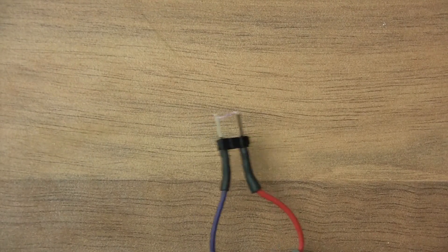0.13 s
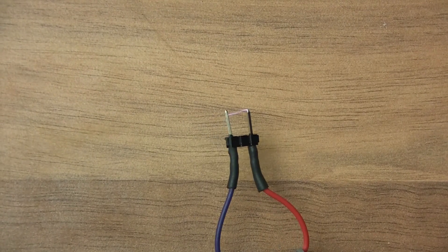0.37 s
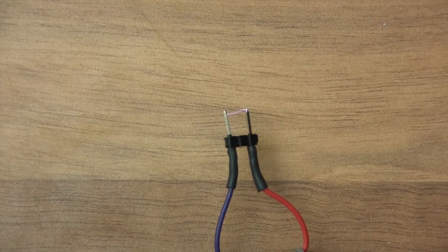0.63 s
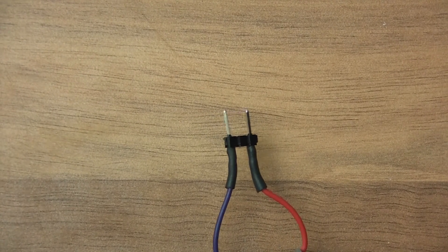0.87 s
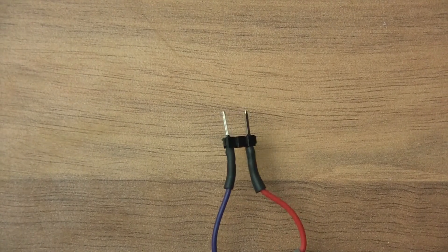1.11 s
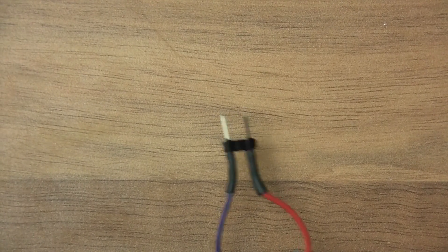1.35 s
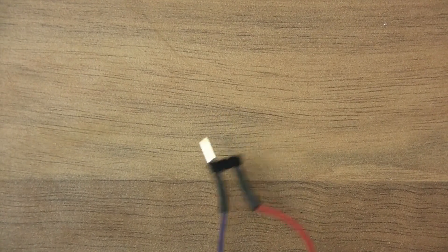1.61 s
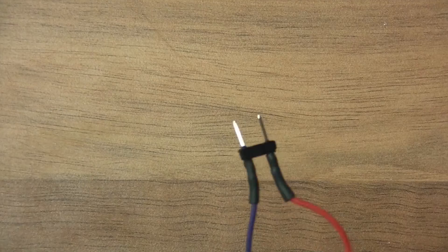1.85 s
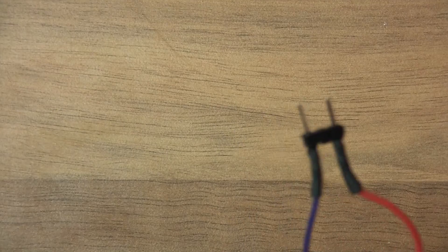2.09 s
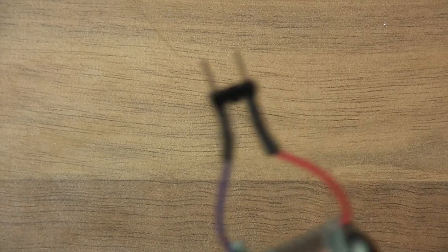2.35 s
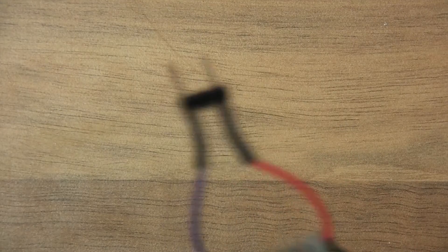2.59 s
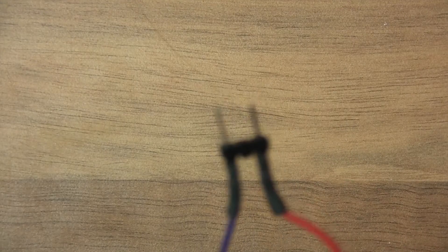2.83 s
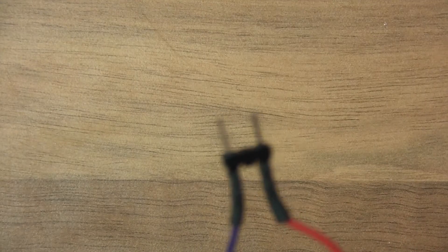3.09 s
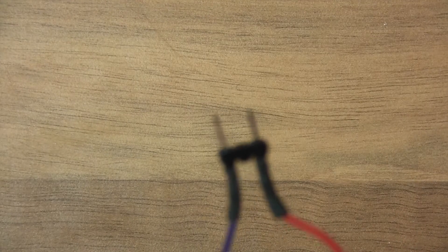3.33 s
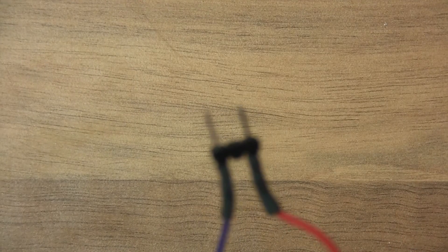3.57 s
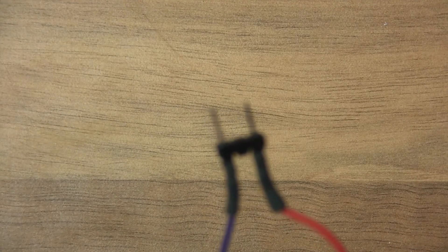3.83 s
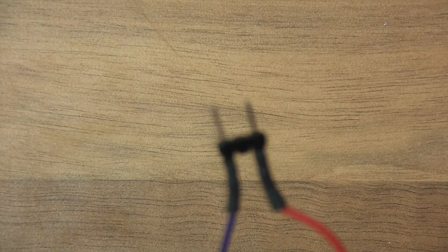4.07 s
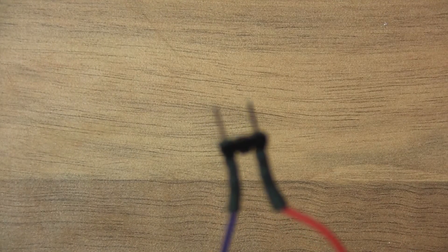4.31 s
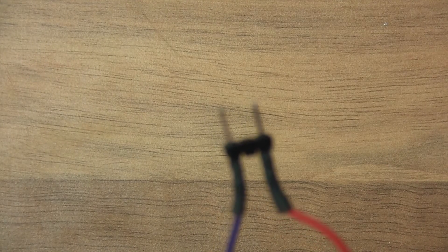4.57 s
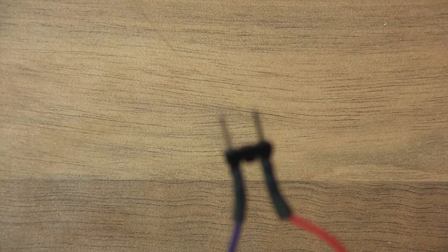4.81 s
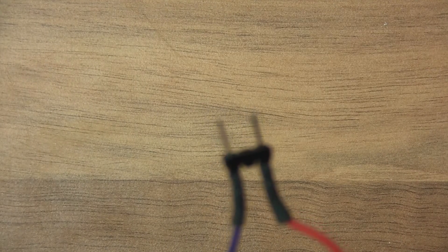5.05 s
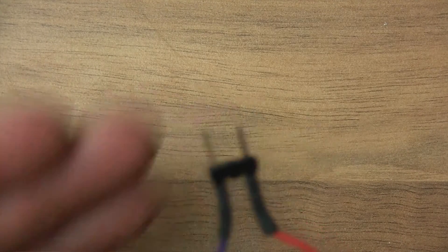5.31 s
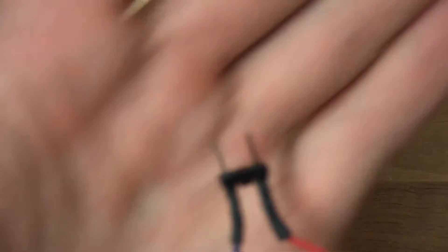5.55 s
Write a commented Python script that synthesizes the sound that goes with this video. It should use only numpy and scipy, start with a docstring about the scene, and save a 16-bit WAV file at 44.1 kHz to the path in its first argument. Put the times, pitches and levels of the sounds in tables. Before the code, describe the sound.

Steady mains hum with soft hiss and a thin, buzzing electronic whine lies under everything. Sharp sparks crack almost immediately, a faint sizzle flares unevenly, then the arc breaks with a smaller crackle. Light scrapes, tiny squeaks and scattered taps of wires on the desk follow, growing sparse. Late on, two hard clacks ring briefly on the wood. Close stereo camera microphone, small quiet room.

```python
"""A small high-voltage arc device on a wooden desk: noise-burst sparks snap, treble noise fizzes between them.
Under it lie mains hum and a spinning motor (harmonic sines), thin high whines (gated and swelling sines) and
hiss (shaped noise). Wires tick (struck modes) and rub (friction noise) on the desk; a hard object lands in two
knocks (clicks and ringing modes). A quiet room answers; the stereo camera microphone is close."""
import sys
import numpy as np
from scipy import signal
from scipy.fft import rfft, irfft
from scipy.io import wavfile
from scipy.ndimage import uniform_filter1d

SR = 44100
rng = np.random.default_rng(int(sys.argv[2]) if len(sys.argv) > 2 else 0)


def voltage_ratio(level):
    """Linear amplitude factor for a level in decibels (scalar or array-like)."""
    return 10 ** (np.asarray(level, float) / 20)


def wav_out(sig):
    """Save sig, one row per channel (or a flat mono array), as 16-bit PCM at SR to the path in sys.argv[1]."""
    wavfile.write(sys.argv[1], SR, np.round(np.clip(np.atleast_2d(sig).T, -1, 1) * 32767).astype(np.int16))


N = 249944
T = np.arange(N) / SR
RIGHTWARD = np.array([[-1], [1]])  # left, right


def along_hz(rows, hz):
    """Read a table on a log-frequency axis."""
    table_hz, values = np.array(rows).T
    return np.interp(np.log(hz + 1), np.log(table_hz), values)


def band(x, centre_hz, width_hz):
    """Butterworth band-pass."""
    edges_hz = np.clip([centre_hz - width_hz / 2, centre_hz + width_hz / 2], 20, SR / 2.1)
    return signal.sosfilt(signal.butter(2, edges_hz, "band", fs=SR, output="sos"), x)


def unit(x):
    """Scale to rms 1."""
    return x / np.sqrt(np.mean(x ** 2))


def walk(rate_hz):
    """Smooth random wander, rms 1: white noise averaged twice."""
    size = int(SR / rate_hz)
    return unit(uniform_filter1d(uniform_filter1d(rng.standard_normal(N), size), size))


def tone(hz, rms_db, lag_rad=0, start_s=0):
    """A steady sine."""
    return np.sqrt(2) * voltage_ratio(rms_db) * np.cos(2 * np.pi * hz * (T - start_s) - lag_rad)


def decay(t60_s, size):
    """Exponential fall by 60 dB in t60_s."""
    return 1000. ** (-T[:size] / t60_s)


def ring(hz, t60_s, size=12000):
    """One struck mode: a sine that decays exponentially."""
    return np.sin(2 * np.pi * hz * T[:size]) * decay(t60_s, size)


def snap(t60_ms, share, size=600):
    """An impulse followed by a short dying rattle; energy 1."""
    rattle = rng.standard_normal(size) * decay(t60_ms / 1000, size)
    rattle = share * rattle / np.linalg.norm(rattle)
    rattle[0] = 1
    return rattle / np.linalg.norm(rattle)


def swells(span_s, held_db, rows, fall_s):
    """Gain that holds a level over a span and rises above it in short swells."""
    start_s, end_s = span_s
    gain = voltage_ratio(held_db) * np.clip(np.minimum(T - start_s, end_s - T) / .03, 0, 1)
    for peak_s, peak_db, rise_s in rows:
        shape = np.interp(T, [peak_s - rise_s, peak_s, peak_s + fall_s], [0, 1, 0])
        gain = gain + voltage_ratio(peak_db) * shape ** 2
    return gain


def stroke(length_s, rise, level_db, noise):
    """One stroke of friction noise: it swells, then fades."""
    t = T[:int(length_s * SR)] / length_s
    envelope = np.interp(t, [0, np.clip(rise, .02, .98), 1], [0, 1, 0])
    return voltage_ratio(level_db) * envelope * unit(noise)[-len(t):]


def add(track, start_s, sound):
    """Mix a sound into a track."""
    i = int(start_s * SR)
    track[i:i + len(sound)] += sound[:N - i]


MAINS_HZ, MAINS_START_S, OVERTONE_LAG_RAD = 49.96, .0016, 1.4
# mains harmonics, before panning: multiple, level_db (rms)
MAINS = [(1, -43.5), (2, -90), (3, -52.5), (4, -69), (5, -61.5), (6, -74), (7, -69), (8, -83), (9, -71),
         (11, -78)]
MOTOR_HZ = 120.03
# spinning motor harmonics: multiple, level_db (rms)
MOTOR = [(1, -55.5), (10, -68.5), (12, -71.5)]


def hum():
    """Mains with locked overtones, a little stronger on the right; the motor's harmonics in the middle."""
    mains = sum(tone(k * MAINS_HZ, level_db, OVERTONE_LAG_RAD * (k > 1), MAINS_START_S)
                for k, level_db in MAINS)
    motor = sum(tone(k * MOTOR_HZ, level_db, np.pi / 2) for k, level_db in MOTOR)
    return mains * voltage_ratio(1.0 * RIGHTWARD) + motor


WHINE_HZ, BURSTS_PER_S, BURST_START_S = 9000, 50, .0052
# repeating pattern of six bursts: gain_db
BURST_GAINS_DB = [1, 4, 4.5, 0, 1.5, 1]
STEADY_HZ, PASSING_HZ = 12207, 13405
PASSING_SPAN_S, PASSING_HELD_DB, PASSING_FALL_S = (2.3, 4.03), -71, .12
# swells of the passing tone, before its wander: peak_s, peak_db (rms), rise_s
PASSING_SWELLS = [(3.55, -65, .1), (3.95, -63, .15)]


def whines():
    """Three sines: one in quick bursts with short gaps, one steady, one that comes and goes."""
    cycles = (T - BURST_START_S) * BURSTS_PER_S
    gate = np.clip((.5 - np.abs(cycles % 1 - .5)) / .17, 0, 1)
    steps = voltage_ratio(BURST_GAINS_DB)[np.floor(cycles).astype(int) % len(BURST_GAINS_DB)]
    bursts = gate * steps * tone(WHINE_HZ, -66.0) * voltage_ratio(-1.4 * RIGHTWARD)
    passing_gain = swells(PASSING_SPAN_S, PASSING_HELD_DB, PASSING_SWELLS, PASSING_FALL_S)
    passing = passing_gain * voltage_ratio(2.5 * walk(12)) * tone(PASSING_HZ, 0)
    return bursts + tone(STEADY_HZ, -70) + passing


# room and microphone hiss, density before humps and scaling: pitch_hz, level_db (per Hz)
HISS = [(25, -81), (65, -86), (82, -79.5), (105, -83.5), (190, -85.5), (320, -89), (900, -92.5),
        (1500, -90.5), (2100, -94), (4000, -96), (8000, -97), (13000, -98.5), (14900, -97), (15400, -112),
        (16000, -130)]
# broad humps on it: centre_hz, width_hz, gain_db
HUMPS = [(262.8, 15, 10), (401, 6, 10), (530, 83, 4), (658, 42, 3.5), (798, 27, 7), (1030, 400, 5.5),
         (1300, 73, -0.5)]
# left-right correlation: pitch_hz, likeness (0-1)
LIKENESS = [(100, 0.54), (300, 0.63), (640, 0.74), (1400, 0.26), (3000, 0.35), (15000, 0.13)]


def hiss():
    """Coloured noise, more alike on both sides in the bass than in the treble."""
    hz = np.fft.rfftfreq(N, 1 / SR)
    level_db = along_hz(HISS, hz)
    for centre_hz, width_hz, gain_db in HUMPS:
        level_db = level_db + gain_db / (1 + ((hz - centre_hz) / (width_hz / 2)) ** 2)
    like = np.clip(along_hz(LIKENESS, hz), 0, 1)
    mid, side = rfft(rng.standard_normal((2, N)))
    sides = np.sqrt(1 + like) * mid + np.sqrt(1 - like) * side * RIGHTWARD
    return irfft(sides * voltage_ratio(level_db) * np.sqrt(SR / 2), N) / np.sqrt(1 + like.mean())


# sparks as the arc strikes and breaks, dry: start_s, bright_energy_db, centre_hz, t60_ms
SPARKS = [(.1098, -3.5, 11400, 2), (.1113, -5, 12100, 2.4), (.1132, -5.5, 10900, 5), (.1150, -5, 11900, 4),
          (.1163, 0.5, 10800, 3.9), (1.0557, -13, 12000, 0.72), (1.0570, -16, 12000, 1.3),
          (1.0626, -10, 12800, 12), (1.0641, -14.5, 10100, 2.3), (1.0650, -7, 7550, 4.8),
          (1.0666, -8, 7600, 3.3)]
# broad crack under each spark, dry: energy_db at the strike, energy_db at the break
SKIRT_DB = (-12, -14)
FIZZ_DB, FLARE_FALL_S = -67, 0.044
# flare-ups of the fizz, dry: peak_s, peak_db (rms), rise_s
FLARES = [(.684, -55, .02), (.856, -56, 0.15), (.955, -57, 0.1), (1.02, -62, .06)]


def arc():
    """Sparks snap around a bright centre with a broad skirt; between them the arc fizzes in the treble."""
    out = np.zeros(N)
    for start_s, bright_db, centre_hz, t60_ms in SPARKS:
        bright = band(snap(t60_ms, 6), centre_hz, .45 * centre_hz)
        crack = snap(t60_ms, 2.6)
        skirt = band(crack, 6200, 4900) + band(crack, 1280, 1500)
        skirt_db = SKIRT_DB[int(start_s > FLARES[0][0])]
        add(out, start_s, voltage_ratio(bright_db) * bright / np.linalg.norm(bright)
            + voltage_ratio(skirt_db) * skirt / np.linalg.norm(skirt))
    fizz = unit(band(rng.standard_normal(N), 13200, 4600) * voltage_ratio(2.7 * walk(60)))
    burning_s = (SPARKS[0][0], SPARKS[-1][0])
    return out + swells(burning_s, FIZZ_DB, FLARES, FLARE_FALL_S) * fizz


def thump():
    """The switch thumps the desk as the arc strikes: one low mode."""
    out = np.zeros(N)
    add(out, SPARKS[0][0], voltage_ratio(-40) * ring(92, 0.1))
    return out


# desk top and room reverberation: pitch_hz, t60_s
ROOM = [(300, 0.33), (800, 0.15), (2000, 0.21), (5000, 0.18), (9000, 0.065), (14000, 0.12)]


def room(x, wet_db, alike):
    """Direct sound plus a decaying noise tail, band by band, partly different on each side."""
    size, tail = 16000, 0
    for hz in 200 * 2 ** np.arange(0, 6.6, .5):
        mid, side = band(rng.standard_normal((2, size)), hz, hz / 2.82)
        tail = tail + (mid + (1 - alike) * side * RIGHTWARD) * decay(along_hz(ROOM, hz), size)
    tail = tail * np.minimum(T[:size] / 0.004, 1)
    return x + voltage_ratio(wet_db) * signal.fftconvolve(tail, x[None])[:, :N]


# small taps and ticks, dry: start_s, level_db (nominal peak), ring_hz, hardness_db (share of broad tick)
TAPS = [(0.271, -40, 4670, -6), (0.291, -44, 4310, -10), (0.2967, -22, 1607, -10), (.840, -39.5, 1690, -2),
        (1.063, -38, 795, -8), (1.581, -39, 1700, -3), (1.860, -31.5, 551, -0.5), (1.910, -44.5, 2267, 5.5),
        (2.104, -41, 644, -16), (2.140, -45, 780, -14), (2.694, -26.5, 4500, -4), (2.708, -39.5, 2130, 2),
        (2.809, -35, 620, -12), (2.897, -42, 996, 2.5), (3.257, -36.5, 1030, -9), (3.296, -41, 996, -16),
        (3.379, -43, 1030, -16), (3.418, -42, 1030, -16), (3.663, -42.5, 1230, -19),
        (4.018, -37.5, 1030, -7), (4.950, -35.5, 1104, -14)]
OVERTONE_RATIO, OVERTONE_DB = 1.87, -6  # level relative to hardness


def tap_t60_s(hz):
    """Ring time of a tap, shorter towards the treble."""
    return 0.036 * (1000 / hz) ** 0.32


def taps():
    """Each tap rings a mode cluster and throws a short broad tick; hardness lifts tick and overtone."""
    out = np.zeros(N)
    for start_s, level_db, hz, hardness_db in TAPS:
        t60_s, overtone_hz = tap_t60_s(hz), OVERTONE_RATIO * hz
        neighbours = sum(ring(hz * (1 + .09 * d), 1.5 * t60_s) for d in rng.standard_normal(3))
        body = ring(hz, t60_s) + .22 * neighbours
        body = body / np.abs(body).max()
        body = body + voltage_ratio(hardness_db + OVERTONE_DB) * ring(overtone_hz, tap_t60_s(overtone_hz))
        body = body * np.minimum(T[:len(body)] / 0.0013, 1)  # a soft contact pushes for a moment
        tick = band(snap(500 * t60_s, 2.4, size=6000), hz + 1500, 3500)
        add(out, start_s, voltage_ratio(level_db) * body)
        add(out, start_s, voltage_ratio(level_db + hardness_db) * tick / np.abs(tick).max())
    return out


# wires and hand rubbing, level before envelope and grain:
# start_s, length_s, rise (share of length), level_db (rms), centre_hz
RUBS = [(1.422, .34, 0.5, -53, 540), (1.517, 0.17, .05, -58.5, 4270), (1.518, 0.093, 0.14, -51.5, 2010),
        (1.577, 0.15, 0, -48, 1000), (2.556, .25, 0.5, -55, 1340), (2.637, .11, 0.45, -51.5, 10600),
        (2.804, .06, 0.1, -45, 1770), (2.833, .078, 0.34, -48, 840), (2.953, 0.28, 0.17, -57.5, 1350),
        (3.029, .09, .54, -59, 530), (5.394, .079, .06, -60, 1190), (5.495, 0.36, 0.2, -60, 3400)]
RUB_WIDTH = 0.76  # share of centre_hz
# resonances every rub excites: centre_hz, width_hz, gain_db
RUBBED = [(540, 140, 0.5), (860, 670, -5), (1300, 154, 4.5), (1820, 770, -6.5)]
# wire sleeve squeaks, level before envelope and grain: start_s, length_s, level_db (rms)
SQUEAKS = [(1.509, 0.018, -52), (1.585, .03, -58), (1.636, .045, -56.5)]
SQUEAK_HZ, SQUEAK_WIDTH_HZ, SQUEAK_RISE = 8240, 200, 0.37


def rubs():
    """Grainy friction: uneven noise favours the resonances near each stroke's centre; thin squeaks join."""
    out, grain = np.zeros(N), voltage_ratio(2.1 * walk(190))
    for start_s, length_s, rise, level_db, centre_hz in RUBS:
        noise = band(rng.standard_normal(16000), centre_hz, RUB_WIDTH * centre_hz)
        resonances = sum(voltage_ratio(gain_db) * band(noise, hz, width_hz) for hz, width_hz, gain_db in RUBBED)
        add(out, start_s, stroke(length_s, rise, level_db, noise + resonances))
    for start_s, length_s, level_db in SQUEAKS:
        squeak = band(rng.standard_normal(16000), SQUEAK_HZ, SQUEAK_WIDTH_HZ)
        add(out, start_s, stroke(length_s, SQUEAK_RISE, level_db, squeak))
    return out * grain


# object and desk modes: pitch_hz, t60_s, first_end_db, second_end_db (relative)
BODY = [(165, 0.09, -29, -14), (270, 0.096, -1.5, -13), (358.4, 0.22, -24, -9), (522, 0.13, -3.5, -38),
        (585, 0.21, -11.5, -11), (682, 0.18, 8.5, -41), (740, 0.14, -27, -3), (821, 0.074, 4, -8),
        (942, 0.074, 0.5, 8.5), (1070, 0.034, 7, 10), (1202, 0.23, 1, -9), (1280, 0.26, -9, -17),
        (1453, 0.076, -24, -8), (1547, 0.14, -8.5, -1.5), (1753, 0.043, 1, 11), (1980, 0.052, -3.5, -6),
        (2190, 0.019, 11.5, 2.5), (2583, 0.069, 4, -9), (3010, 0.032, 3.5, -21), (3094, 0.037, 3.5, -12),
        (3400, .05, -36, -23), (3770, 0.014, -0.5, 6.5), (4440, 0.018, 4, -7), (5160, 0.022, 6.5, 9),
        (5930, 0.034, 0.5, -23)]
# two landings, each with a rebound: start_s, strength_db, end (0 or 1)
CONTACTS = [(5.1196, 0.5, 0), (5.1217, 2.5, 0), (5.2158, 0, 1), (5.2172, 2, 1)]
RING_DB = -29  # ringing relative to strength


def knocks():
    """Every contact clicks and sets modes ringing; each end of the object favours its own modes."""
    out, size = np.zeros(N), 12000
    for start_s, strength_db, end in CONTACTS:
        body = 0
        for k, (hz, t60_s, *ends_db) in enumerate(BODY):
            # unlisted neighbours, wider towards the treble, blur the pitch
            spread = .04 * np.sqrt(hz / 2000)
            neighbours = sum(np.sign(d) * ring(hz * (1 + spread * d), t60_s) for d in rng.standard_normal(4))
            cluster = ring(hz, t60_s) + .4 * neighbours
            body = body + (-1) ** k * voltage_ratio(ends_db[end]) * cluster
        clatter = band(rng.standard_normal(size) * decay(0.14, size), 2660, 3700)
        rumble = band(rng.standard_normal(size) * decay(0.24, size), 930, 1130)
        ringing = body + voltage_ratio(3.5) * clatter + voltage_ratio(8.0) * rumble
        add(out, start_s, voltage_ratio(strength_db + RING_DB) * ringing)
        click = snap(4, .4)
        click = band(click, 3700, 3800) + voltage_ratio(-7.0) * band(click, 7700, 11000)
        add(out, start_s, voltage_ratio(strength_db) * click)
    return out


HOUSING_HZ, HOUSING_WIDTH_HZ, HOUSING_DB = 4500, 540, -5
BOTTOM_HZ, TOP_HZ = 150, 15400


def scene():
    """Steady bed plus events in their room; the camera housing lifts one resonance of the events."""
    events = room(taps() + rubs(), -29, 0.74) + room(knocks(), -36.5, 0.64) * voltage_ratio(-.7 * RIGHTWARD)
    sparks = room(arc(), -31, 0.49)
    # the top treble of the arc reaches the right side better
    events = events + sparks + 0.34 * RIGHTWARD * band(sparks, 12200, 5000)
    events = events + voltage_ratio(HOUSING_DB) * band(events, HOUSING_HZ, HOUSING_WIDTH_HZ)
    # small objects radiate no deep bass; the microphone rolls off at the top
    roll_off = signal.butter(4, [BOTTOM_HZ, TOP_HZ], "band", fs=SR, output="sos")
    events = signal.sosfilt(roll_off, events)
    return hum() + whines() + hiss() + events + thump()


def low_pass(x):
    """Removes everything above the highest recorded frequency."""
    return signal.sosfilt(signal.butter(12, 16470, fs=SR, output="sos"), x)


def record(dry):
    """The camera stores the finished mix."""
    return low_pass(dry)


dry = scene()
out = record(dry)
wav_out(out)
```